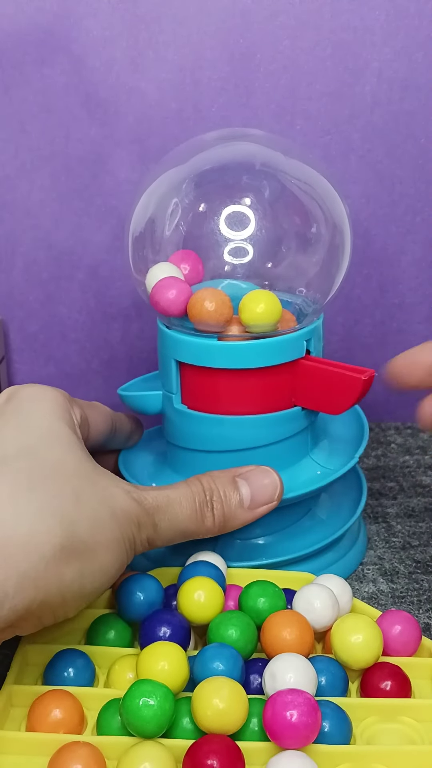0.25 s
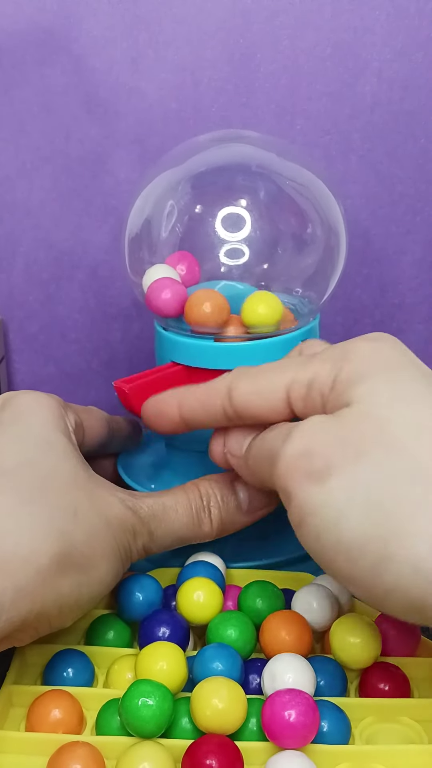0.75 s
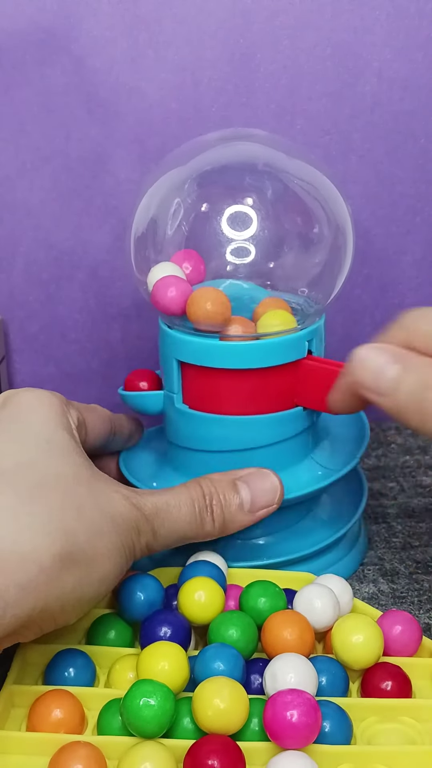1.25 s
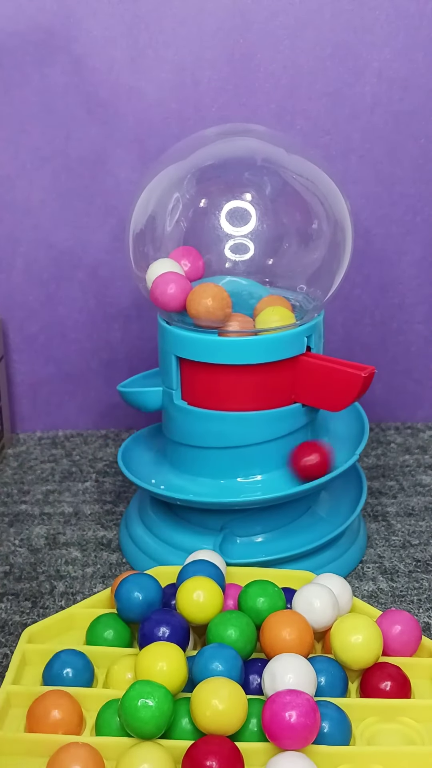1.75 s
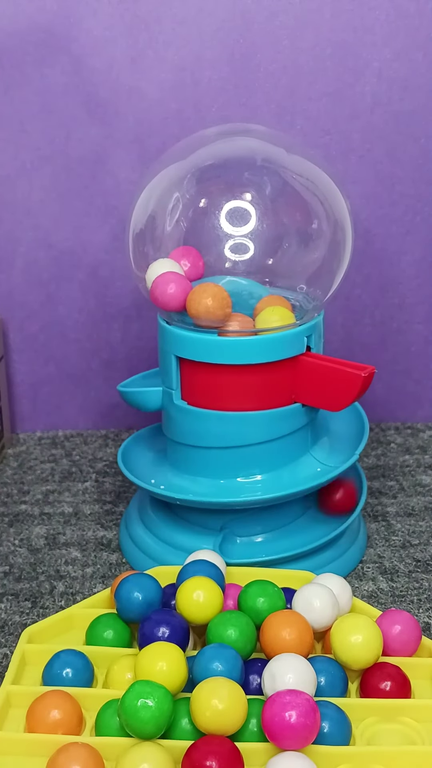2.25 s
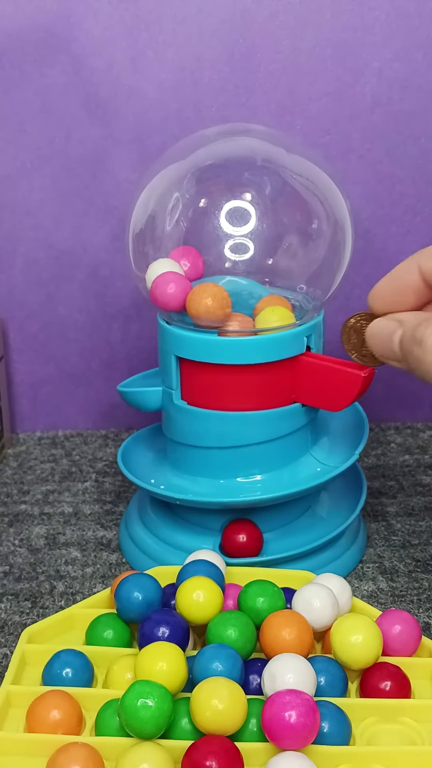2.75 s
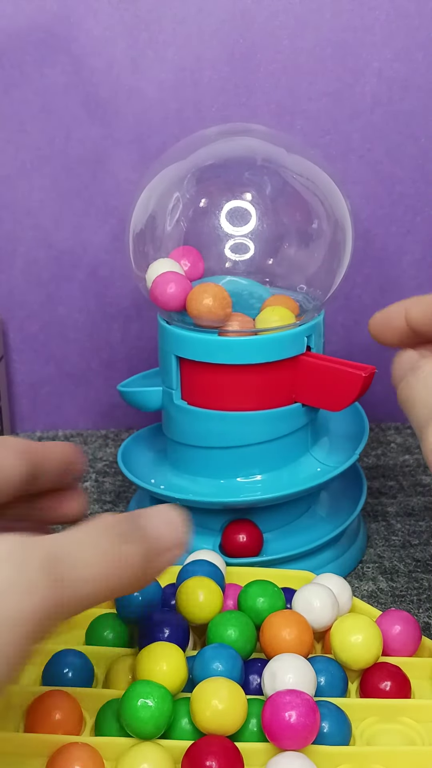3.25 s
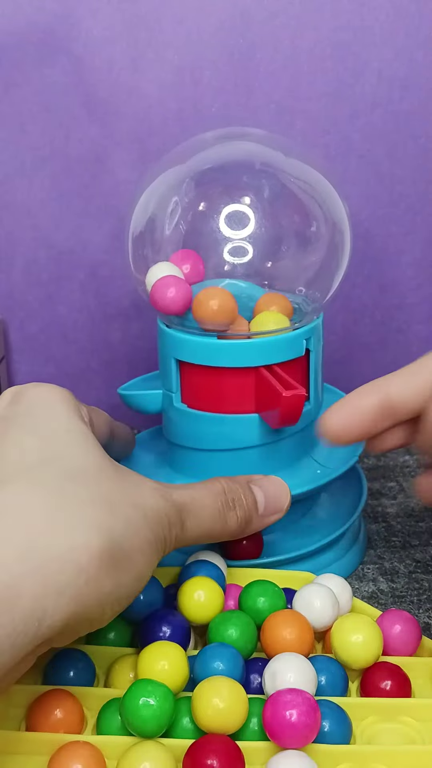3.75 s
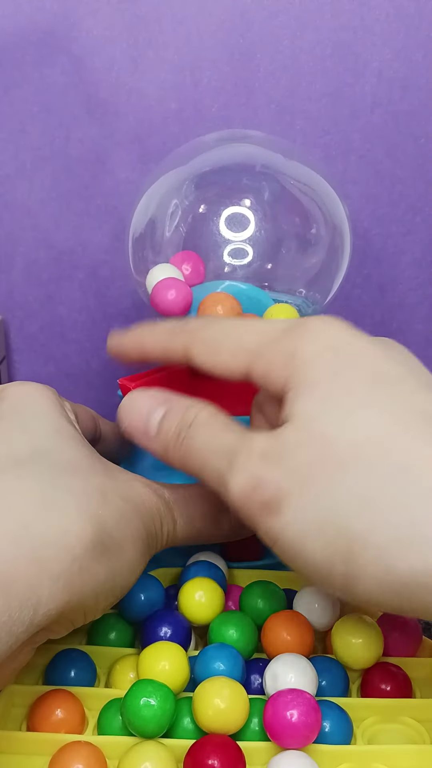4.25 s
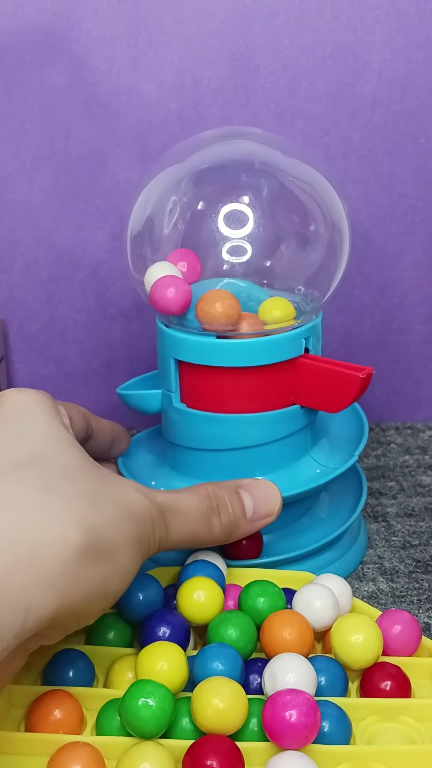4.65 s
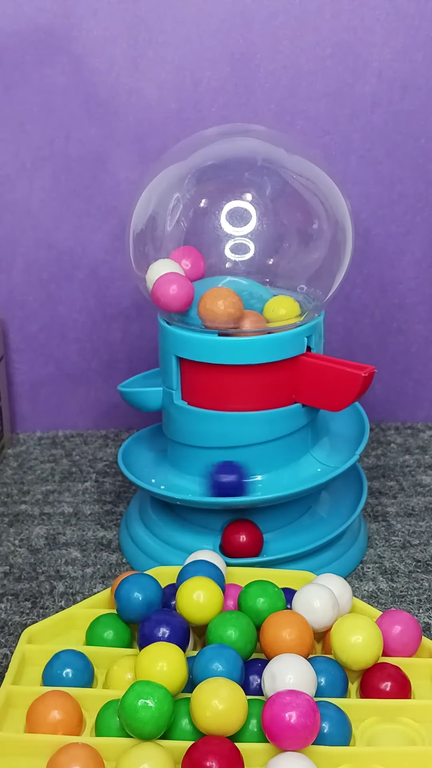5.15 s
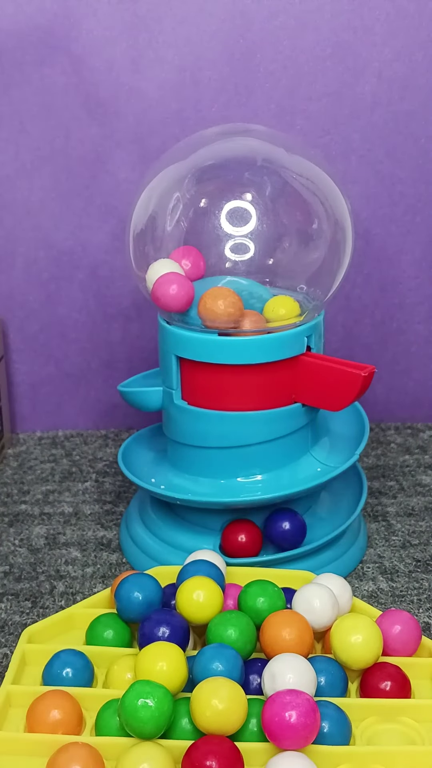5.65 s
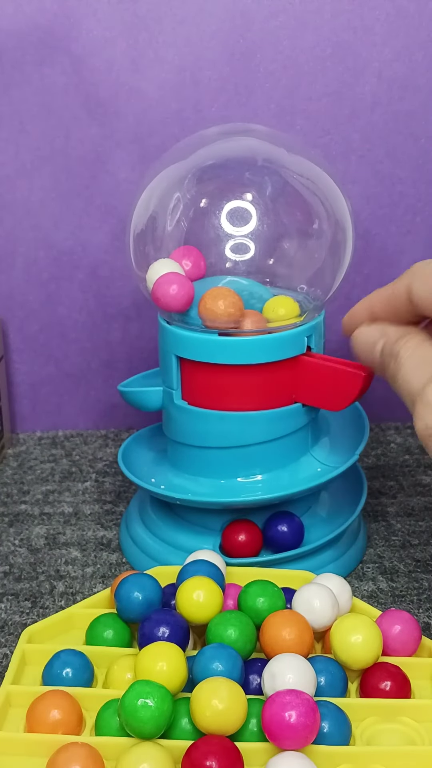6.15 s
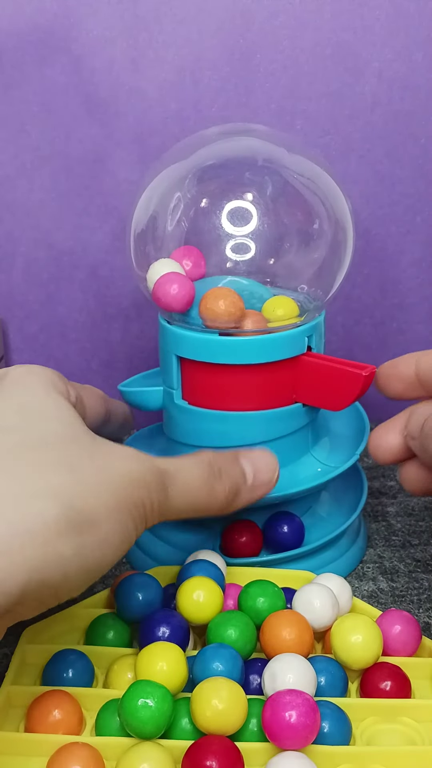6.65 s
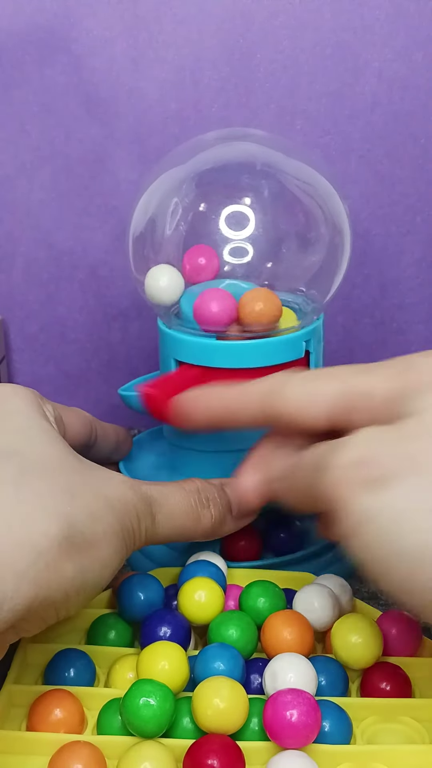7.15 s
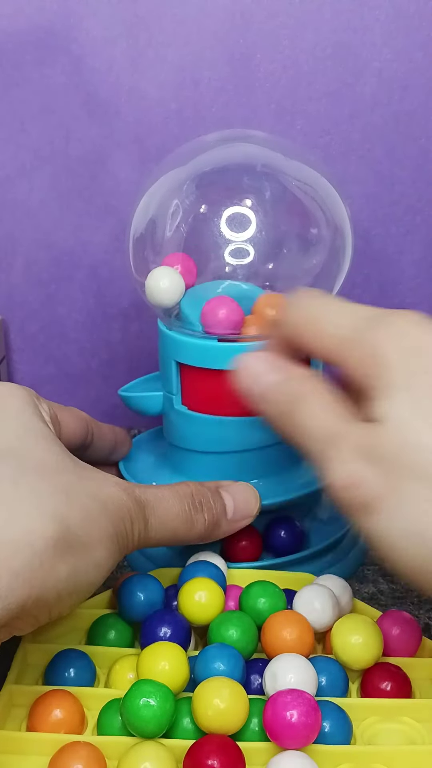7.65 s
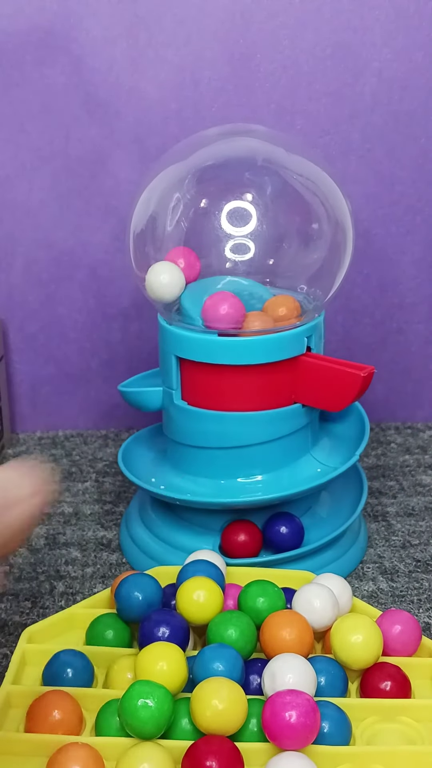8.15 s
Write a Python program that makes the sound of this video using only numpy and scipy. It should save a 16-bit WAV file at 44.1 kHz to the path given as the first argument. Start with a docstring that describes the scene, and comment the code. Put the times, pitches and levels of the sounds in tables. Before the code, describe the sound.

Close, dry stereo in a small quiet room. A light coin clicks into a thin plastic gumball toy, the lever clacks and scrapes across and springs back with a faint high metallic sizzle, and balls knock together. One ball rolls down the spiral ramp, speeding up and swelling over the hollow base, and knocks at the bottom. The cycle repeats twice more, the last roll cut short.

```python
"""In a small room, close to the microphone, a toy gumball machine of thin plastic is worked three times.
A toy coin clicks down the slot, the lever is pushed across and springs back, the balls jostle,
and one ball rolls down the spiral ramp. Each blow is a crack, a ring of the plastic shell and a boom of
its hollow base; sliding and rolling are trains of small bumps over grit. A faint room noise lies below."""
import sys
import numpy as np
from scipy import signal
from scipy.fft import rfft, irfft
from scipy.io import wavfile
from scipy.ndimage import uniform_filter1d

SR = 44100
rng = np.random.default_rng(int(sys.argv[2]) if len(sys.argv) > 2 else 0)


def transcribe(u):
    """Save the signal u as a 16-bit wav file named by the first command-line argument.

    u: samples, shape (n,) or (channels, n), limited to [-1, 1]; the rate is SR.
    q: integer samples, one column per channel.
    """
    v = np.clip(np.atleast_2d(u).T, -1, 1)
    q = np.round(v * 32767).astype(np.int16)
    wavfile.write(sys.argv[1], SR, q)


N = 370881  # length of the scene, samples
BLOW_SIZE = 11025  # length of one blow, samples


def amp(db):
    """Decibels to gain."""
    return 10 ** (np.asarray(db) / 20)


def read(points, hz):
    """Reads a table joined by straight lines over log frequency."""
    f, value = np.transpose(points)
    return np.interp(np.log(hz + 1), np.log(f + 1), value)


def unit(x):
    """Scales a stereo sound to a mean energy of one per channel."""
    return x / np.sqrt(np.sum(x ** 2) / 2 + 1e-20)


def add(mix, start_s, sound):
    """Mixes a stereo sound in at its start time."""
    part = mix[:, max(round(start_s * SR), 0):][:, :sound.shape[1]]
    part += sound[:, :part.shape[1]]


def causal(x, db):
    """Filters x without pre-ringing (minimum phase); db is the gain as a function of frequency."""
    log_gain = np.log(amp(db(abs(np.fft.fftfreq(1024, 1 / SR)))))
    taps = np.fft.ifft(np.exp(np.conj(signal.hilbert(log_gain)))).real
    return signal.oaconvolve(x, taps[None], axes=1)[:, :x.shape[1]]


def panned(x, left_db):
    """Leans a sound to the left by left_db."""
    return x * amp([[left_db / 2], [-left_db / 2]])


# how alike the two microphone ports hear the toy: pitch_hz, likeness (correlation, no unit)
PORT_LIKENESS = [(60, 0.7), (200, 0.64), (450, 0.93), (750, 0.25), (1300, -0.2), (2400, -0.03), (4500, 0)]


def pair(size):
    """Stereo noise, alike in the bass and unrelated in the treble."""
    a, b = rfft(rng.standard_normal((2, size)))
    same = np.clip(read(PORT_LIKENESS, np.fft.rfftfreq(size, 1 / SR)), -1, 1)
    return irfft(np.array([a, same * a + np.sqrt(1 - same ** 2) * b]), size)


def burst(decay_s, rise_s):
    """A puff of dense vibration that swells and dies."""
    t = np.arange(BLOW_SIZE) / SR
    return unit(pair(BLOW_SIZE) * np.exp(-t / decay_s) * (1 - np.exp(-t / rise_s)))


# colour of the still room's noise: pitch_hz, level_db
QUIET_COLOUR = [(15, -35.5), (25, -17.5), (64, -6), (145, -35.5), (212, -24.5), (242, -28), (344, -32.5),
                (516, -27.5), (840, -36.5), (3520, -37.5), (5730, -39), (11300, -32), (16000, -35.5)]
QUIET_DB = -71  # overall level


def quiet():
    """The still room's faint rumble and hiss, as noise shaped over frequency."""
    noise = irfft(rfft(pair(N)) * amp(read(QUIET_COLOUR, np.fft.rfftfreq(N, 1 / SR))), N)
    return amp(QUIET_DB) * np.sqrt(N) * unit(noise)


# how long the room rings on: pitch_hz, t60_s
ROOM_DECAY = [(150, 0.13), (500, 0.39), (2000, 0.18), (6000, 0.17), (14000, 0.15)]


def room(x, tail_db, wall_db, wall_s):
    """A short tail that fades at its own rate in each band, and a scattered echo from the wall behind the toy."""
    hz, t, bands = signal.stft(pair(SR // 2), SR, nperseg=256)
    fading = bands * amp(-60 * t / read(ROOM_DECAY, hz)[:, None])
    tail = signal.istft(fading, SR, nperseg=256)[1]
    response = np.zeros((2, SR // 2))
    add(response, .004, amp(tail_db) * unit(tail))
    add(response, wall_s, amp(wall_db) * burst(0.0036, 0.0001))
    return signal.oaconvolve(x, response, axes=1)[:, :N]


def ring(modes, scatter_db=4.0, detune=.008):
    """Dying modes whose strength, phase and exact pitch are drawn anew for every blow."""
    t = np.arange(BLOW_SIZE) / SR
    hz, db, t60 = np.transpose(modes)[:, :, None]
    hz = hz * (1 + detune * rng.standard_normal(hz.shape))
    # the less alike the ports hear a pitch, the further apart its phases
    apart = np.arccos(np.clip(read(PORT_LIKENESS, hz), -1, 1)) * rng.standard_normal(hz.shape)
    phase = 2 * np.pi * rng.random(hz.shape) + np.array([0 * apart, apart])
    size = amp(db + scatter_db * rng.standard_normal(hz.shape))
    waves = np.exp((2j * np.pi * hz - np.log(1000) / t60) * t)
    return unit(((size * np.exp(1j * phase))[:, :, 0] @ waves).imag)


# modes of the hollow base: pitch_hz, level_db, t60_s
HOLLOW_MODES = [(363, -10.5, 0.071), (417, -8.5, 0.12), (448, 0.5, 0.096), (465.9, -1.5, 0.14),
                (511.2, -1.5, .17), (472, 5, 0.14), (609.3, -6.5, .12)]
# the whole toy rocking on the carpet: pitch_hz, level_db, t60_s
THUD_MODES = [(68, 0, 0.094), (105, -5, .1), (155, 1.5, 0.13), (178, -10.5, 0.06), (272, 0, 0.072)]


def boom(thud_db, swell_s=0.011):
    """The hollow base takes some milliseconds to build up, and the toy thuds on the floor."""
    swell = 1 - np.exp(-np.arange(BLOW_SIZE) / SR / swell_s)
    hollow = unit(ring(HOLLOW_MODES, detune=.04) * swell)
    thud = unit(ring(THUD_MODES, detune=0.06) * swell)
    return hollow + amp(thud_db) * thud


PORT_LAG = 7  # the right port hears the toy this many samples after the left


def direct(x, likeness=0.2):
    """Sound straight from the toy reaches the left port a few samples before the right."""
    same = np.clip(likeness, 0, 1)
    late = np.pad(x[0], (PORT_LAG, 0))[:x.shape[1]]
    return unit(np.array([x[0], same * late + np.sqrt(1 - same ** 2) * x[1]]))


def crack(decay_s, tick_db=-3):
    """The instant of contact: one hard tick, then a few milliseconds of shivering plastic."""
    tick = np.zeros((2, BLOW_SIZE))
    add(tick, .0006, np.eye(PORT_LAG + 1)[[0, PORT_LAG]])  # one sample in each port
    # a long, dragging contact has hardly any tick
    bluntness_db = 30 * np.log10(max(decay_s / .002, 1))
    return unit(direct(burst(decay_s, 0.00048)) + amp(tick_db - bluntness_db) * tick)


# modes of the plastic shell, all damped alike: pitch_hz, level_db
SHELL_MODES = [(855, -10.5), (1895, 5), (1945, -2.5), (2085, 5.5), (2910, -2.5), (3305, -3.5), (3660, 5),
               (3970, -8), (4445, -1.5), (4613, -4.5), (4882, -7)]
SHELL_T60 = .17  # s


def plastic(colour, ring_db, treble_db, crack_s, ring_s, modes_db):
    """One blow: a short crack, then the shell's dense ring with a few modes standing out."""
    hz = np.arange(700, 11800, 20.)
    # each spot on the shell favours its own resonances
    spot = np.c_[np.geomspace(700, 16000, 36), 1.6 * rng.standard_normal(36)]

    def tone(f):
        return read(colour, f) + read(spot, f)

    power, high = amp(tone(hz)) ** 2, hz > 5500
    lift_db = treble_db - 10 * np.log10(power[high].sum() / power[~high].sum())

    def hardness(f):
        return tone(f) + lift_db * read([(3500, 0), (7000, 1)], f)

    body = crack(crack_s) + amp(ring_db) * burst(ring_s, 0.0017)
    # evens out the loudness of the colours below 5.5 kHz
    dense = causal(body, hardness) / np.sqrt(power[~high].sum() * 20 / (SR / 2))
    modes = ring([(f, db, SHELL_T60) for f, db in SHELL_MODES], detune=.008)
    return dense + amp(ring_db + modes_db) * modes


def blows(table, colour, crack_s, ring_s, modes_db, gain_db, thud_db):
    """Plays a table of blows on the toy; gain_db trims them all, and levels refer to a span of 5 ms."""
    out = np.zeros((2, N))
    for start_s, level_db, ring_db, treble_db, boom_db in table:
        shell = plastic(colour, ring_db, treble_db, crack_s, ring_s, modes_db)
        sound = shell + amp(boom_db) * boom(thud_db)
        add(out, start_s, amp(level_db + gain_db) * np.sqrt(.005 * SR) * sound)
    return out


def struck(table, treble_db, boom_db, boom_follow, treble_follow):
    """Completes each blow: the more a contact rings the shell, the more treble and base boom it has."""
    return [(start_s, level_db, ring_db, treble_db + treble_follow * ring_db, boom_db + boom_follow * ring_db)
            for start_s, level_db, ring_db in table]


def rattle(runs, colour, per_s, uneven, spread_db, grit_db, ring_db, treble_db, gain_db, hollow_db, thud_db,
           count=6):
    """Plastic moving on plastic: small uneven bumps over fine grit, each ringing the shell and the base."""
    out = np.zeros((2, N))
    spots = [plastic(colour, ring_db, treble_db, .0015, .022, -4) for _ in range(count)]
    booms = [boom(thud_db) for _ in range(count)]
    for rows in runs:
        s, rattle_db, rumble_db = np.transpose(rows)
        t = np.arange(s[0], s[-1], 1 / SR)
        gaps, sizes = rng.standard_normal((400, 2)).T
        at = (np.cumsum(np.exp(uneven * gaps)) * SR / per_s).astype(int)
        inside = at < len(t)
        bumps = np.zeros(len(t))
        bumps[at[inside]] = amp(spread_db * np.clip(sizes, -2, 2))[inside]
        grit = rng.standard_normal(len(t)) * (rng.random(len(t)) < 900 / SR)
        force = bumps + amp(grit_db) * grit
        # level the force out, so that the curves alone set the loudness
        local_power = abs(uniform_filter1d(force ** 2, size=4000))
        force *= signal.windows.tukey(len(t), .03) / np.sqrt(local_power + 1e-12)
        spot = rng.integers(0, count, len(t))
        for k in range(count):
            for level_db, sound in ((rattle_db + gain_db, spots[k]), (rumble_db + hollow_db, booms[k])):
                drive = force * (spot == k) * amp(np.interp(t, s, level_db))
                add(out, s[0], signal.fftconvolve(drive[None], sound, axes=1))
    return out


def strokes(table, attack_s, sag_db_per_s, release_s, depth_db=18):
    """Each movement starts quickly, loses force and lets go: curves of start_s, rattle_db, rumble_db."""
    curves = []
    for start_s, length_s, rattle_db, rumble_db in table:
        t = np.linspace(0, length_s, 50)
        ends = np.maximum(1 - t / attack_s, 0) + np.maximum(1 - (length_s - t) / release_s, 0)
        shape_db = -sag_db_per_s * t - depth_db * ends
        curves.append(np.c_[start_s + t, rattle_db + shape_db, rumble_db + shape_db])
    return curves


# a ball runs down the spiral ramp: start_s, length_s, rattle_db, rumble_db (of the hollow base);
# both levels are for one lap a second at the boomy point of the lap
ROLLS = [(1.29, 1.075, -63, -56.5), (4.58, 1.066, -61.5, -54), (7.82, 0.71, -60.5, -55.5)]
START_LAPS_PER_S, GAIN_LAPS_PER_S2 = 0.96, 1.073  # the ball's speed at the top, and its steady acceleration
RATTLE_DB_PER_DOUBLING, RUMBLE_DB_PER_DOUBLING = 12, 7.5  # growth with speed
BOOMY_LAP, LAP_DIP_DB = 0.26, 20.5  # where in each lap the ball drives the base best; loss on the far side
OPEN_SIDE_DB = 4.5  # the rattle is clearer on the part of the lap where the base booms least


def descents():
    """The ball gathers speed and loudness, and the base swells once a lap: curves as in strokes."""
    curves = []
    for start_s, length_s, rattle_db, rumble_db in ROLLS:
        t = np.linspace(0, length_s, 100)
        doublings = np.log2(START_LAPS_PER_S + GAIN_LAPS_PER_S2 * t)
        laps = START_LAPS_PER_S * t + GAIN_LAPS_PER_S2 * t ** 2 / 2
        far_side = np.sin(np.pi * (laps - BOOMY_LAP)) ** 2
        rattle_curve = rattle_db + RATTLE_DB_PER_DOUBLING * doublings + OPEN_SIDE_DB * far_side
        rumble_curve = rumble_db + RUMBLE_DB_PER_DOUBLING * doublings - LAP_DIP_DB * far_side
        curves.append(np.c_[start_s + t, rattle_curve, rumble_curve])
    return curves


def circling(x):
    """The rolling ball's echo off the toy's wall shifts back and forth in delay and sweeps the colour."""
    near_s, swing_s, sweep_s = .0010, .0010, .62  # shortest delay, its added swing, time of one sweep
    n = np.arange(N)
    delay = near_s + swing_s * (1 + np.sin(2 * np.pi * n / SR / sweep_s)) / 2
    depth = np.array([[.72], [.4]])  # left, right
    bright = causal(x, lambda f: read([(400, -14), (1000, 0)], f))
    echo = np.array([np.interp(n - delay * SR, n, side) for side in bright])
    return (x + depth * echo) / np.sqrt(1 + depth ** 2)


# colour of the ball on the ramp: pitch_hz, level_db
ROLL_COLOUR = [(40, -15), (250, -15.5), (500, -13.5), (700, -6), (950, -1.5), (1250, -8.5), (1700, 2.5),
               (2200, 1), (2700, -2), (3300, 2), (4500, -10.5), (6500, -11.5), (12000, -17), (16000, -22.5)]


def ramp():
    """One ball bumps its way round the spiral, as uneven bumps under a moving echo."""
    rolling = rattle(descents(), ROLL_COLOUR, per_s=70, uneven=.42, spread_db=4.5, grit_db=-16.0,
                     ring_db=-5.0, treble_db=-11.0, gain_db=0, hollow_db=0.0, thud_db=-31.5)
    return circling(rolling)


# balls hit each other, the dispenser, the ramp and its end wall:
# start_s, level_db (crack, before trim), ring_db (shell re crack), treble_db (re lower band), boom_db (re crack)
BALL_HITS = [(.7563, -24, -5, -13.5, -10), (.7887, -27, -1, -12, -12), (.8027, -24.5, -7, -7.5, -18),
             (.8366, -24.5, -21, -14, -6.5), (.8975, -22, -9.5, -10.5, -26), (.9434, -36.5, -1, -2.5, -21),
             (1.1835, -32.5, 2, -8, -14), (1.1988, -25.5, -10, -18, -12), (1.2681, -31.5, -18, -12, -15),
             (1.3539, -37, -2.5, -9, -20), (1.7575, -48.5, 9, -2, -10), (2.0967, -39.5, 4, -8, 5),
             (2.2065, -35, 4, -7.5, -3), (2.3377, -45, -13, -32, -23), (2.3806, -17, -9.5, -19.5, -21),
             (2.426, -31.5, 0.5, -16, -21), (2.439, -26, -23, -16, -22), (2.5263, -53, -12, -12, -21),
             (2.6036, -38.5, -6.5, -25, -18.5), (2.648, -54, -4, -23, -14),
             (3.8108, -34.5, -21.5, -35, -26), (3.96, -35.5, 1, -23, 4), (4.0378, -17.5, -4.5, -12, -9),
             (4.0847, -20, -4, -11.5, -28), (4.1186, -23, 1.5, -13, -18), (4.137, -36, -10, -16, -21),
             (4.16, -40, 8, -16, 5.5), (4.469, -24.5, -8, -10, -23), (4.4863, -28, -23, -21, -17),
             (4.5222, -24.5, -25, -20, -18), (4.598, -34, -2.5, -10.5, -14), (4.8176, -39, -4, -8, -5),
             (5.0929, -45, -6, -13, -15), (5.187, -60, -7, -5, -15), (5.6397, -31.5, -2, -20, -19),
             (5.6681, -23, -2, -6, -23), (5.7275, -32.5, 2, -23, -16), (5.738, -33.5, -11, -3, -20),
             (5.777, -50.5, -4, -3, -16.5), (7.3578, -13.5, -9, -11, -15.5), (7.4231, -20, -0.5, -10, -8),
             (7.4635, -32, 7, -6.5, 1), (7.502, -33, 7.5, -7, -12), (7.595, -33.5, -13, -4, 3),
             (7.7095, -27.5, 5.5, -12, -28), (7.716, -20.5, -8, -13, -15), (7.7778, -30, 2.5, -13.5, -27),
             (7.8541, -34.5, -13, -17, -26), (8.2922, -43, -10, -5.5, -14)]
# colour of a ball's knock: pitch_hz, level_db
BALL_COLOUR = [(40, -24), (250, -29), (500, -15.5), (850, -6.5), (1150, -8.5), (1750, 2.5), (2200, 4),
               (2700, -6.5), (3400, 0.5), (4600, -15.5), (5600, -15.5), (9000, -16.5), (13500, -23),
               (16000, -28)]
# balls jostle in the globe and the dispenser: start_s, length_s, rattle_db, rumble_db (both before trim)
JOSTLES = [(.775, .06, -37, -44.5), (1.21, 0.078, -43, -52), (3.93, 0.066, -44, -50),
           (4.09, .16, -40.5, -50), (7.44, 0.081, -38, -51), (7.66, .14, -44, -49)]
# the ball rolls up to the end wall and back from it: start_s, length_s, rattle_db (before trim)
SETTLES = [(2.299, 0.062, -47.5), (2.55, 0.051, -62.5), (2.615, 0.081, -58), (5.608, 0.068, -45)]
# the soft contact of a ball in the trough: pitch_hz, level_db
TROUGH_COLOUR = [(40, -34), (500, -16), (900, 1), (1700, 11), (2300, 8.5), (3400, -17), (5000, -25),
                 (16000, -29)]
TROUGH_BOOM_DB = -25  # hollow rumble re rattle at the foot of the ramp, before their trims


def balls():
    """The balls knock, jostle near the lever, and roll softly in the trough at the foot of the ramp."""
    hits = blows(BALL_HITS, BALL_COLOUR, crack_s=0.0034, ring_s=0.024, modes_db=-10.0, gain_db=-3.0, thud_db=-19)
    jostle = rattle(strokes(JOSTLES, attack_s=.015, sag_db_per_s=27.5, release_s=.015), BALL_COLOUR,
                    per_s=70, uneven=.45, spread_db=3.5, grit_db=-13.5, ring_db=-7, treble_db=-9.5,
                    gain_db=1.5, hollow_db=-2.5, thud_db=-8)
    trough = [(start_s, length_s, db, db + TROUGH_BOOM_DB) for start_s, length_s, db in SETTLES]
    settle = rattle(strokes(trough, attack_s=.006, sag_db_per_s=21, release_s=0.011), TROUGH_COLOUR,
                    per_s=70, uneven=.4, spread_db=7, grit_db=-19.5, ring_db=-14, treble_db=-32,
                    gain_db=1, hollow_db=-6, thud_db=-23)
    return hits + jostle + settle


# the coin enters the slot and tumbles inside: start_s, level_db (crack, before trim), ring_db (shell re crack)
COIN_CLICKS = [(.0629, -30, -9), (.1093, -20, -6.5), (2.949, -53, 4), (2.9613, -24.5, 2),
               (2.9902, -26, -18), (3.1, -28.5, -12), (3.1478, -20, -4.5), (6.016, -63.5, -1),
               (6.032, -57, 2.5), (6.119, -51.5, 1), (6.1361, -30.5, 0), (6.1645, -38.5, 2),
               (6.1884, -22, -24), (6.2268, -17, -4), (6.2643, -37, -11.5), (6.2782, -24.5, -4.5),
               (6.3002, -31, -14.5)]
# colour of the coin's click: pitch_hz, level_db
COIN_COLOUR = [(40, -28.5), (250, -28), (500, -16), (1000, -13.5), (1500, -6.5), (2050, 3.5), (2550, -5.5),
               (3400, -1), (4600, -12), (5600, -18.5), (9000, -20.5), (13500, -28.5), (16000, -40.5)]


def coin():
    """The light coin clicks down the slot, each click a short blow on the shell."""
    clicks = struck(COIN_CLICKS, treble_db=-10.0, boom_db=-8.0, boom_follow=1.0, treble_follow=0.42)
    return blows(clicks, COIN_COLOUR, crack_s=.0022, ring_s=0.025, modes_db=-9.5, gain_db=-2, thud_db=-20)


# the return spring shivers: start_s, length_s, level_db (first twang, before trim and a small random spread)
SPRING_SHIVERS = [(.354, .02, -28), (0.801, .02, -32), (0.906, .02, -35), (4.119, .12, -31.5),
                  (4.996, .02, -40.5), (5.261, .06, -38), (7.408, .14, -31.5)]
JOLT_GAP_S = .034  # time between twangs while it shivers
REJOLT_DB = -5.5  # later twangs re the first


def jolts():
    """While the spring shivers it twangs again and again, softer than at first: rows of start_s, level_db."""
    return [(start_s + after, level_db + REJOLT_DB * (after > 0) + rng.standard_normal())
            for start_s, length_s, level_db in SPRING_SHIVERS
            for after in np.arange(0, length_s, JOLT_GAP_S)]


# the spring's crowded resonances: pitch_hz, level_db
SPRING_COLOUR = [(8000, -32.5), (11300, -18), (12000, -8.5), (12350, -16), (12720, -2.5), (13050, -10),
                 (13380, -9.5), (13800, -15.5), (15500, -25)]


def spring(gain_db, decay_s=0.017):
    """The small steel spring sizzles very high when it is jolted, and its main modes sing on briefly."""
    out = np.zeros((2, N))
    singing = [(12690, 0, .2), (12790, -6, .16), (13365, -5, .16)]  # pitch_hz, level_db, t60_s
    for start_s, level_db in jolts():
        sizzle = unit(causal(burst(decay_s, .001), lambda f: read(SPRING_COLOUR, f)))
        twang = unit(sizzle + amp(-4) * ring(singing, detune=.0015))
        add(out, start_s, amp(level_db + gain_db) * np.sqrt(.02 * SR) * twang)
    return out


# the shell hums briefly as the lever creeps: start_s, level_db
CREEP_HUMS = [(.489, -55.5), (1.092, -53), (1.122, -53)]


def hums(swell_s=.005, t60=.08):
    """A slow slip has no crack and wakes only the shell's modes near 2 kHz."""
    out = np.zeros((2, N))
    swell = 1 - np.exp(-np.arange(BLOW_SIZE) / SR / swell_s)
    near_2_khz = [(hz, db, t60) for hz, db in SHELL_MODES if 1700 < hz < 2300]
    for start_s, level_db in CREEP_HUMS:
        hum = unit(ring(near_2_khz, detune=.02) * swell)
        add(out, start_s, amp(level_db) * np.sqrt(.02 * SR) * hum)
    return out


# the lever catches, slips and hits its stops:
# start_s, level_db (crack, before trim), ring_db (shell re crack), treble_db (re lower band), boom_db (re crack)
LEVER_CLACKS = [(.3068, -28, 5.5, -0.5, 0.5), (.3552, -15, 4.5, -7.5, -6.5), (.3791, -16, -6.5, -6.5, -8.5),
                (.406, -26.5, -15, -4, -3), (.6231, -33.5, 6, -7.5, -26), (.6868, -17, -13, -7.5, -1),
                (.6899, -14.5, 2, -6, -5.5), (.7139, -19, -5, -19.5, -25), (1.1584, -36, 8.5, -10.5, -3),
                (1.2222, -23.5, -4.5, -15.5, 0), (3.6392, -24.5, 3, -6.5, -4.5),
                (3.6537, -25.5, 10.5, -6, 0.5), (3.6662, -13, -2.5, -3.5, -28), (3.6851, -25, -14, -25, 2),
                (3.8537, -40.5, -1.5, -13, -13), (3.9146, -25.5, -4, -2, -16),
                (4.0019, -11.5, -3, -4, -14.5), (4.3102, -30.5, 0.5, -6, -10.5), (4.415, -35, 2, 0.5, 4),
                (4.4429, -25, -2, -8.5, -15), (6.7437, -33, -4, -9, -8.5), (6.8375, -19.5, 3, -3.5, -3),
                (6.8579, -13, -3, -5, -6), (6.9352, -21, -6, -5.5, -5), (6.9572, -25.5, -6.5, -8, -25),
                (6.9941, -37, -6, -13, -6), (7.048, -29.5, -3.5, -5.5, -5.5),
                (7.2056, -10, -3.5, -4.5, -6.5), (7.412, -30, 1, -4, -3.5), (7.4351, -33, 1, -2, -1),
                (7.5678, -21.5, -6, -7, -3)]
# fingers and lever bump the housing dully: start_s, level_db (crack, before trim), ring_db (shell re crack)
HAND_KNOCKS = [(.3472, -32, 11), (.6331, -34, 6.5), (1.0426, -43.5, 6), (1.1489, -35.5, 4.5),
               (1.2891, -37, 7.5), (2.8336, -48, 4.5), (2.9293, -50, 7.5), (3.532, -37.5, -1.5),
               (3.632, -38.5, 2), (3.908, -50.5, 9), (3.9385, -28, 1.5), (3.993, -33, 7),
               (4.401, -28.5, 1.5), (4.4544, -29, 5.5), (6.7217, -40, 10), (6.847, -27, 12.5),
               (7.1138, -45.5, 16.5), (7.1433, -28.5, 1.5), (7.6571, -27.5, 5.5)]
# the lever slides in its guide or shifts under the fingers:
# start_s, length_s, rattle_db (scrape), rumble_db (hollow base), both before trim
LEVER_SLIDES = [(.63, 0.09, -36, -40), (.76, .26, -32.5, -48), (1.06, 0.15, -50, -49),
                (2.815, 0.045, -45, -60), (3.515, 0.031, -41, -53), (3.71, 0.11, -37.5, -44),
                (4.07, 0.2, -30, -42.5), (4.32, 0.11, -44, -48.5), (4.39, 0.29, -37, -43.5),
                (6.705, 0.044, -41, -51), (6.82, 0.046, -28, -43), (6.88, 0.12, -40, -37.5),
                (7.22, 0.16, -33, -39), (7.40, 0.28, -28, -37.5), (7.64, 0.29, -35, -42)]
# colour of the lever's contacts: pitch_hz, level_db
LEVER_COLOUR = [(40, -23.5), (150, -12), (240, -23), (480, -7), (850, -2), (1300, -8.5), (1950, 1.5),
                (2500, -9), (3300, -0.5), (4500, 1.5), (5500, -6.5), (9000, -8), (13500, -11),
                (16000, -22.5)]


def lever():
    """The lever's clacks, the dull bumps of the hand, its scraping in the guide, its hums and its spring."""
    clacks = blows(LEVER_CLACKS, LEVER_COLOUR, crack_s=.0042, ring_s=0.028, modes_db=-3.5, gain_db=-3.5,
                   thud_db=-21)
    bumps = struck(HAND_KNOCKS, treble_db=-13.5, boom_db=1, boom_follow=.3, treble_follow=.15)
    knocks = blows(bumps, LEVER_COLOUR, crack_s=0.0026, ring_s=.026, modes_db=-5.5, gain_db=-2.5, thud_db=-23.5)
    slide = rattle(strokes(LEVER_SLIDES, attack_s=0.019, sag_db_per_s=43, release_s=.04), LEVER_COLOUR,
                   per_s=90, uneven=.6, spread_db=4.5, grit_db=-10.5, ring_db=-5.5, treble_db=-10,
                   gain_db=-6.5, hollow_db=-4, thud_db=-12.5)
    return clacks + knocks + slide + hums() + spring(gain_db=1.5)


# how the two ports differ in colour: pitch_hz, level_db (left minus right)
PORT_BALANCE = [(60, 3.5), (150, 6.5), (400, 0.5), (550, 2.5), (850, -3.5), (1300, -1.5), (1950, 4.5),
                (2500, -5), (3300, -6), (4500, 5.5), (6000, 2.5), (9000, 8.5), (14000, 11.5)]


def ports(x):
    """Two microphone ports that face different ways each colour the sound."""
    left = causal(x[:1], lambda f: read(PORT_BALANCE, f) / 2)
    right = causal(x[1:], lambda f: -read(PORT_BALANCE, f) / 2)
    return np.vstack([left, right])


def scene():
    """All parts of the toy, heard in the room through the two ports, over the room's own noise."""
    toy = panned(ramp(), left_db=-0.5) + panned(balls(), left_db=-1.0)
    toy += panned(coin(), left_db=-2.0) + panned(lever(), left_db=-2.0)
    heard = toy + room(toy, tail_db=-19.0, wall_db=-15.5, wall_s=.014)
    return quiet() + ports(heard)


EDGE_HZ = 15850  # upper limit of the band


def record(dry):
    """Rounds off the tallest peaks softly, then cuts the treble above the band's edge."""
    rounded = dry / (1 + (dry / .9) ** 4) ** .25
    lowpass = signal.firwin(255, EDGE_HZ, window=("kaiser", 9), fs=SR)
    return signal.oaconvolve(rounded, lowpass[None], "same")


dry = scene()
out = record(dry)
transcribe(out)
```